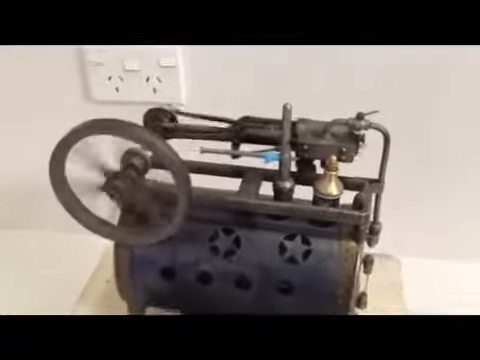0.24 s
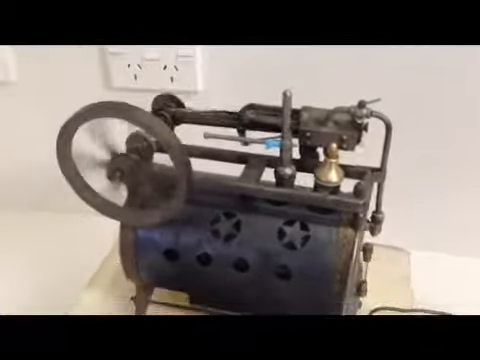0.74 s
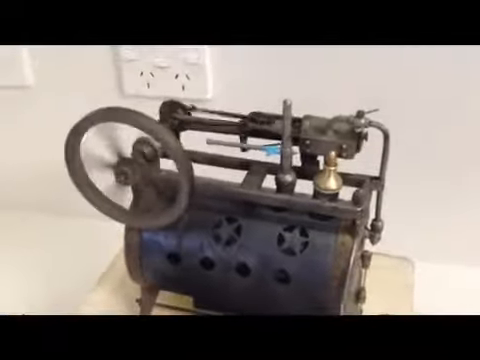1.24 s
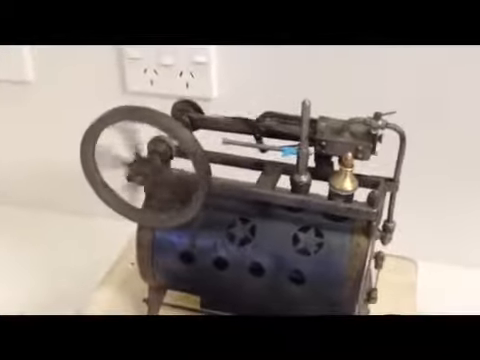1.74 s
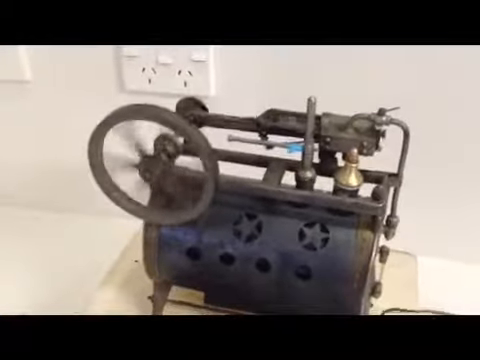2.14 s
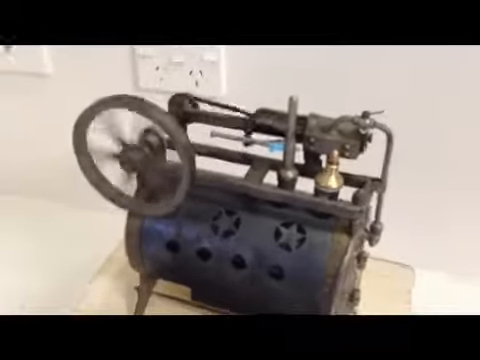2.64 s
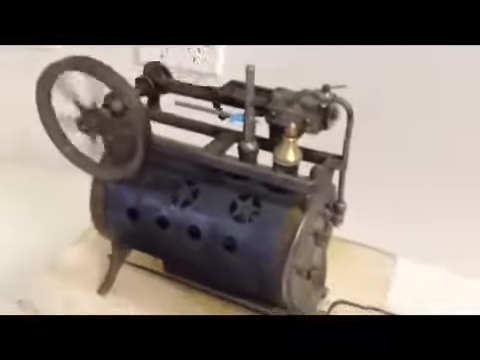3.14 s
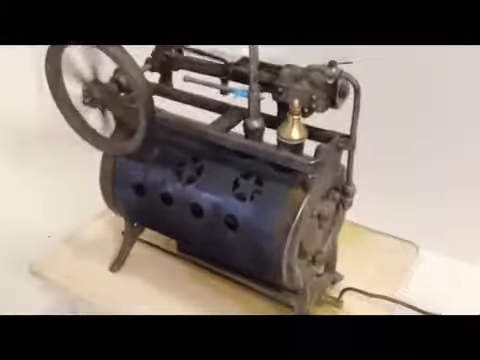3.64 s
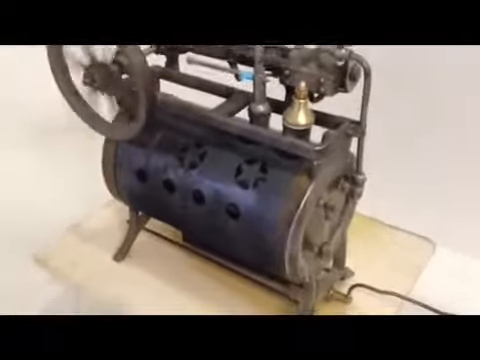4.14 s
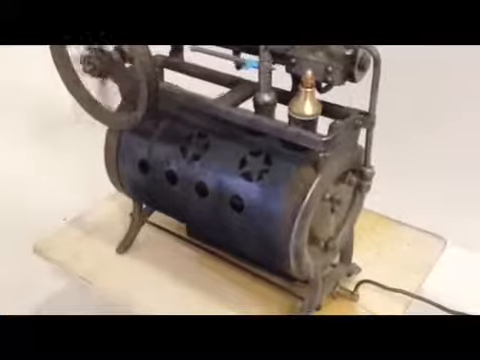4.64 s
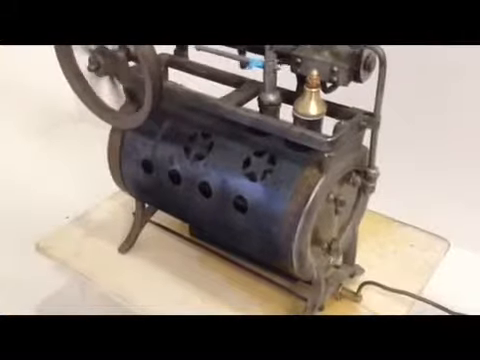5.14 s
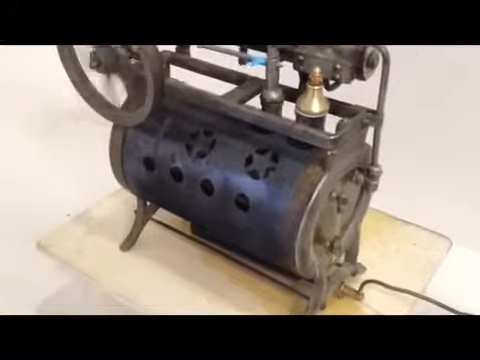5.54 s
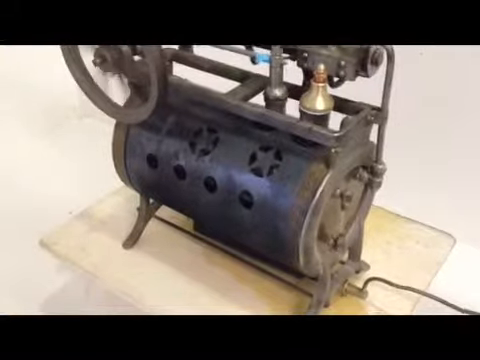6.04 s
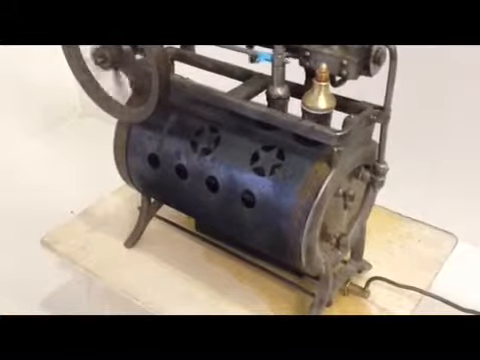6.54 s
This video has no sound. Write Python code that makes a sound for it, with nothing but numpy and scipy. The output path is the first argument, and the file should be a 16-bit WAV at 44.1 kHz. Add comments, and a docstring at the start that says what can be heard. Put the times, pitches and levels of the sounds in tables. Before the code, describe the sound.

Rapid mechanical chugging from a small metal engine, already running and never stopping. A rough low piston judder alternates with a dull bouncing rod knock, giving about six beats a second. Thin casing clatter, fine ticks and small puffs fill the gaps, bearings rumble softly and leaking steam hisses brightly throughout. Close, dry handheld pickup with a very short room reflection and little deep bass.

```python
"""A toy steam engine runs at about three turns a second on a wooden board; each turn the piston judders
through one stroke as a rough tone with jolts, and the slack rod knocks the board on the way back.
The slide valve clicks and puffs, the linkage clatters and ticks, the bearings rumble as filtered noise,
and leaking steam hisses as coloured noise; the view swings from the boiler's side to its end."""
import sys
import numpy as np
from scipy import signal
from scipy.fft import rfft, irfft, next_fast_len
from scipy.io import wavfile

SR = 44100
rng = np.random.default_rng(int(sys.argv[2]) if len(sys.argv) > 2 else 0)


def unload_audio(sound):
    """Save the sound as a 16-bit wav file, at the path given as the first command line argument."""
    columns = np.transpose(np.atleast_2d(sound))
    # keep every value between -1 and 1, then stretch to whole-number steps
    steps = np.round(np.clip(columns, -1, 1) * 32767)
    wavfile.write(sys.argv[1], SR, steps.astype(np.int16))


N = 298557

# modes of the board under the engine: f/Hz, relative level/dB, t60/s
BOARD_MODES = [(127.3, -31.0, 0.027), (230.5, -2.0, 0.066), (298.6, 8.9, 0.028), (366.7, 2.3, 0.092),
               (404.6, -11.3, 0.074), (497.5, -22.9, 0.079), (593.1, -17.6, 0.05)]
# camera swing from the boiler's side to its end: t/s, share of the way
CAMERA_SWING = [(0, 0), (2.4, 0.34), (3.3, 0.42), (4.3, 1), (6.8, 0.98)]
# piston's outward strokes, one a turn: t/s, level/dB before trims
STROKES = [(0.1313, -32.8), (0.4723, -31.7), (0.8112, -33.5), (1.1526, -31.4), (1.49, -32.0),
           (1.8227, -32.7), (2.1573, -33.0), (2.488, -34.6), (2.8179, -34.0), (3.1415, -32.6),
           (3.4659, -31.3), (3.7884, -31.8), (4.1062, -31.4), (4.4284, -31.2), (4.7462, -31.4),
           (5.0651, -31.5), (5.3808, -31.6), (5.6993, -31.6), (6.0099, -31.5), (6.3215, -31.1),
           (6.6328, -31.8)]
# rod's knocks on the return stroke: t/s, level/dB, rebound/dB and last touch/dB re first blow,
# metal crack/dB before trims
ROD_KNOCKS = [(0.293, -33.3, 0.1, -9.8, -41), (0.6336, -32.6, -0.6, -9.1, -41),
              (0.9738, -34.3, 0.1, -13.8, -47), (1.3111, -31.7, -3.6, -7.6, -41),
              (1.6474, -32.7, -2.0, -9.6, -40), (1.9819, -32.5, -4.5, -11.4, -45),
              (2.3155, -34.9, -0.1, -14.1, -45), (2.6443, -32.3, -2.9, -10.0, -41),
              (2.9725, -33.2, -2.8, -15.1, -44), (3.2978, -33.5, -2.9, -11.8, -42),
              (3.6225, -34.5, -0.4, -12.3, -42), (3.9441, -35.5, 1.7, -9.8, -46),
              (4.264, -38.5, 4.4, -4.6, -43), (4.5833, -37.8, 3.3, -9.9, -45),
              (4.902, -37.1, 3.5, -5.3, -46), (5.2242, -32.1, -1.2, -5.6, -45),
              (5.5394, -35.5, -0.8, -8.1, -49), (5.8537, -35.2, -1.3, -9.2, -41),
              (6.1637, -35.8, 1.2, -12.3, -40), (6.4781, -34.9, -2.3, -6.7, -40)]
# valve openings, two a turn: t/s, low ring/dB, high ring/dB, click/dB, all before trims
VALVE_OPENINGS = [(0.123, -53, -56.5, -55), (0.276, -48, -63, -51), (0.463, -47, -47, -48),
                  (0.617, -43.5, -56.5, -49), (0.802, -60, -45.5, -46), (0.953, -61, -56, -51),
                  (1.138, -55, -54.5, -49), (1.293, -47, -54, -40), (1.483, -62, -53, -50),
                  (1.628, -50, -50, -45), (1.819, -61, -49.5, -55), (1.963, -48, -54.5, -43),
                  (2.144, -55, -56.5, -49), (2.296, -48.5, -63, -51), (2.481, -62, -51, -53),
                  (2.627, -47, -51, -39), (2.805, -57, -49, -53), (2.952, -48.5, -63, -55),
                  (3.13, -49, -52, -41), (3.278, -48, -54, -46), (3.462, -53, -50, -54),
                  (3.607, -64, -60, -51), (3.776, -63.5, -55, -51), (3.925, -53, -53.5, -49),
                  (4.098, -53.5, -60.5, -51), (4.242, -58, -57, -48), (4.423, -58, -50, -45),
                  (4.565, -53, -58, -48), (4.739, -51, -57.5, -48), (4.882, -52, -55.5, -48),
                  (5.056, -55, -50.5, -49), (5.206, -64, -64, -53), (5.372, -49, -55, -42),
                  (5.517, -48, -52.5, -41), (5.686, -55, -46, -44), (5.83, -47.5, -61, -49),
                  (6.004, -53, -56, -47), (6.144, -55, -49, -48), (6.31, -45.5, -54, -41),
                  (6.456, -47, -55, -40), (6.624, -57, -52, -46)]
CRACK_T60_S = .02  # bare metal contact


def amp(db):
    """Decibels to gain."""
    return 10 ** (np.asarray(db) / 20)


def unit(x):
    """Scale to rms 1."""
    return x / np.sqrt(np.mean(x ** 2) + 1e-20)


def clock(count=N):
    """Time of each sample, s."""
    return np.arange(count) / SR


def curve(rows, s):
    """Each column after the first, interpolated at time s."""
    knots, *cols = np.transpose(rows)
    return [np.interp(s, knots, c) for c in cols]


def filtered(x, response):
    """x times a response of frequency, with zero padding."""
    m = next_fast_len(len(x) + SR // 4)
    spectrum = rfft(x, m) * response(np.fft.rfftfreq(m, 1 / SR))
    return irfft(spectrum, m)[:len(x)]


def coloured(x, spectrum):
    """x through a (f/Hz, level/dB) response, at rms 1."""
    f, db = np.transpose(spectrum)
    return unit(filtered(x, lambda hz: amp(np.interp(np.log(hz + 1), np.log(f), db))))


def noise(count=N):
    """Fresh white noise."""
    return rng.standard_normal(count)


def wobble(falloff_hz, count=N):
    """Smooth random curve of rms 1; its spectrum falls by 1/e every falloff_hz."""
    return unit(filtered(noise(count), lambda hz: np.exp(-hz / falloff_hz)))


def swell(t, rise_s, t60_s):
    """Envelope that rises to 1, then dies away exponentially."""
    rise = np.sin(np.pi / 2 * np.clip(t / rise_s, 0, 1)) ** 2
    return rise * amp(-60 * np.maximum(t - rise_s, 0) / t60_s)


def add(track, s, x):
    """Mix x into the track at time s."""
    part = track[max(round(s * SR), 0):][:len(x)]
    part += x[:len(part)]


def ring(modes, t):
    """Decaying sines of a struck body from t = 0; neighbouring modes swing opposite ways."""
    t = np.maximum(t, 0)
    out = 0
    for k, (hz, db, t60_s) in enumerate(modes):
        out = out + (-1) ** k * amp(db - 60 * t / t60_s) * np.sin(2 * np.pi * hz * t)
    return out


def shaken(x, modes):
    """Modes driven by force x, through a unit-energy impulse response."""
    answer = ring(modes, clock(SR // 4))
    return signal.fftconvolve(x, answer / np.linalg.norm(answer))[:len(x)]


def view():
    """Share of the camera's swing at each sample, 0 to 1."""
    return np.clip(curve(CAMERA_SWING, clock())[0], 0, 1)


def turns(events):
    """Running cycle count at each sample, a whole number at every event of a table."""
    s = np.pad(np.transpose(events)[0], 1, mode="reflect", reflect_type="odd")
    return np.interp(clock(), s, np.arange(len(s)))


def casing(force):
    """Sheet-metal boiler casing: its modes weigh differently towards the side and the end."""
    # f/Hz, relative level from the side/dB, relative level from the end/dB, t60/s
    casing_modes = [(585, 6, 0, 0.061), (703, 8.5, 1, 0.075), (780, 3, -1, 0.06), (900, -3, -5, 0.08),
                    (1080, -2, -4, 0.08), (1186, -8, -6, 0.06), (1290, 0, -3, 0.05), (1402, -7, -4.5, 0.09),
                    (1457, -2, -9, 0.045), (1660, 5, 1, 0.055), (1777, 10.5, 3, 0.03), (1845, 11, 2, 0.033),
                    (2090, -7, 0, 0.035), (2265, -12, -2, 0.04), (2500, -12, -4, 0.025)]
    side = shaken(force, [(hz, db, t60) for hz, db, _, t60 in casing_modes])
    end = shaken(force, [(hz, db, t60) for hz, _, db, t60 in casing_modes])
    return side + view() * (end - side)


def blow(t):
    """The board's answer to one padded contact at t = 0: modes under a soft onset and an added decay."""
    return ring(BOARD_MODES, t) * swell(t, .003, 0.33)


def crack(db, t60_s):
    """Envelope of one hard metal contact."""
    return amp(db) * swell(clock(SR // 8), 0.00088, t60_s)


def bump(db, contact_s=.0009):
    """Force of one oiled, softer contact: a half sine of fixed area."""
    push = np.sin(np.pi * np.minimum(clock(SR // 100) / contact_s, 1))
    return amp(db) * push / push.sum()


def steam(hiss_db=1, fizz_db=1.0, firebox_db=-5, gland_db=-13, spits_per_s=300, spit_db=-14,
          flutter_db=0.59, surge_db=0.47, surge_peak_cycle=0.29):
    """Wet steam leaks past the glands: a hiss that rings in the firebox, a fine fizz, tiny spits of water."""
    # leak: t/s, hiss level/dB, fizz level/dB, both before trims
    leak = [(0.0, -52, -52), (1.11, -51.5, -51.5), (2.32, -52, -53), (3.18, -51.5, -50), (4.86, -52, -48.5),
            (6.77, -51.5, -49.5)]
    # noise colours: f/Hz, relative level/dB
    hiss_spectrum = [(100, -3), (600, -3.5), (1000, -1), (1550, -2.5), (1950, 2), (2750, 1), (3450, 1.5),
                     (3750, 1.5), (4400, 2.5), (4620, 7), (4780, 4.5), (4930, 1.5), (5150, 0), (5800, 0.5),
                     (7200, 3.5), (10000, -10.5)]
    fizz_spectrum = [(3000, -11.5), (5600, -24), (6700, -7.5), (7600, -2), (8600, -0.5), (9900, -4),
                     (11000, -3), (12400, 1.5), (13500, -2), (14300, -1.5), (15300, -4.5)]
    # hollow resonances of the firebox, heard from its end: f/Hz, relative level/dB, t60/s
    firebox_modes = [(3115, -3.5, 0.041), (3414, -0.5, 0.065), (4844, -1, 0.053), (5660, 8, 0.012),
                     (7410, 10, 0.0074), (8900, -20, 0.01), (12600, -7, 0.0065)]
    # faint singing of the leaking gland: f/Hz, relative level/dB, t60/s
    gland_modes = [(4800, 0, .025)]
    hiss, fizz = curve(leak, clock())
    # the leak surges with each valve opening and sinks before the next
    surge = surge_db * np.cos(2 * np.pi * (turns(VALVE_OPENINGS) - surge_peak_cycle))
    flutter = amp(flutter_db * wobble(29))
    spits = (rng.random(N) < spits_per_s / SR) * noise()

    def jet():
        return noise() + amp(spit_db) * unit(spits)

    body = amp(hiss_db) * coloured(jet(), hiss_spectrum)
    body = body + amp(firebox_db) * view() * unit(shaken(jet(), firebox_modes))
    body = body + amp(gland_db) * unit(shaken(noise(), gland_modes))
    fine = amp(fizz + fizz_db) * coloured(jet(), fizz_spectrum)
    return flutter * (amp(hiss + surge) * body + fine)


def bearings(board_db=-53, table_db=-60, casing_db=-68.0, fresh=0.43, lumpy_db=3.5, swing_db=3.5,
             heaviest_turn=0.45, kick_db=4, kick_fade_turns=.07):
    """Worn bearings rumble through the board; the same rough spots come round on every turn."""
    # rumble colour: f/Hz, relative level/dB
    rumble_spectrum = [(20, -19), (45, -8), (70, -15), (110, -15.5), (160, -4), (195, -1.5), (236, -0.5),
                       (285, -8.5), (360, -8.5), (460, 2), (600, -11), (1500, -33.5)]
    angle = turns(STROKES) % 1
    size = round(np.diff(np.transpose(STROKES)[0]).mean() * SR)
    rough_spots = noise(size)[(angle * size).astype(int)]
    force = unit(rough_spots + fresh * noise())
    # heaviest round the return stroke, with a kick as the outward stroke starts
    load_db = swing_db * np.cos(2 * np.pi * (angle - heaviest_turn))
    load_db = load_db + kick_db * np.exp(-angle / kick_fade_turns)
    wood = amp(board_db) * unit(shaken(coloured(force, rumble_spectrum), BOARD_MODES))
    wood = wood + amp(table_db) * coloured(noise(), rumble_spectrum)
    return amp(load_db + lumpy_db * wobble(66)) * wood + amp(casing_db) * unit(casing(force))


def table(board, hum_db=-55):
    """The board's shaking sets the table top humming in a few narrow tones."""
    # f/Hz, relative level/dB, t60/s
    table_modes = [(239, -3, .2), (302, -1, .22), (346, -1, .25), (371, -1, .25), (409, 6, .2),
                   (576, 9, .18)]
    return board + amp(hum_db) * unit(shaken(board, table_modes))


def valve(puff_db=-52.5, end_db=2, puff_rise_s=0.013, puff_t60_s=0.22, burst_db=-3, burst_t60_s=0.072,
          again_s=0.015, again_db=-7, gear_rise_s=.002, click_db=-2, chink_db=9.5):
    """Slide valve: a sharp puff that tails off; its gear clicks and chinks on opening and at end of travel."""
    # rings of the valve gear, low and high: f/Hz before scatter, t60/s
    gear_rings = [(6640, 0.019), (7560, 0.0093)]
    # puff colour, then bare metal click colour: f/Hz, relative level/dB
    puff_spectrum = [(100, -50), (400, 16), (1500, 6), (4000, 6.5), (8000, 6), (15000, 2)]
    click_spectrum = [(1000, -25), (3000, -8), (6000, -13), (8500, 6), (10300, 6), (12300, 12), (15000, -9)]
    puffs, chinks, clicks = np.zeros((3, N))
    t = clock(SR // 3)
    rub = swell(t, gear_rise_s, 0.019) + amp(again_db) * swell(t - again_s, gear_rise_s, 0.018)
    puff = swell(t, puff_rise_s, puff_t60_s) + amp(burst_db) * swell(t, 0.0055, burst_t60_s)
    for s, *levels_db, hit_db in VALVE_OPENINGS:
        add(clicks, s, crack(hit_db + click_db, CRACK_T60_S))
        add(clicks, s + again_s, crack(hit_db + click_db + again_db, CRACK_T60_S))
        add(puffs, s - .002, puff)
        for (hz, t60_s), db in zip(gear_rings, levels_db):
            mode = (hz * (1 + 0.0046 * rng.standard_normal()), 0, t60_s)
            chink = shaken(rub * noise(len(t)), [mode])
            add(chinks, s, amp(db + chink_db) * chink / np.abs(chink).max())
    puffing = amp(puff_db + end_db * view()) * puffs * coloured(noise(), puff_spectrum)
    return chinks + clicks * coloured(noise(), click_spectrum) + puffing


def contacts(touch_lead_s=.009, crack_lead_s=0.002497, end_lead_s=0.00292, touch_db=20, crack_db=-3.0,
             tap_bump_db=17, tap_crack_db=-3, play_early_turns=0.01706, play_end_db=-7.5, board_db=-27,
             scatter_db=1.2):
    """Linkage blows: the rod touches and cracks home, the crank ticks over, bearings shift in their slack."""
    # joint ticks as the crank passes over, a quarter turn before the knock: t/s, level/dB before trims
    crank_taps = [(0.2105, -41.5), (0.551, -46.5), (0.8931, -55), (1.23, -43), (1.5651, -43), (1.9026, -47),
                  (2.235, -51.2), (2.5667, -55), (2.8946, -51), (3.2183, -48), (3.5421, -50), (3.8621, -48),
                  (4.1906, -51.4), (4.503, -53.7), (4.8197, -41), (5.1383, -43), (5.4547, -42),
                  (5.7704, -43), (6.0833, -46), (6.3947, -46)]
    # bearing slack taken up: angle after the knock/turn, soft bump/dB, hard tick/dB, before view and scatter
    bearing_play = [(.055, -22, -67), (.1, -23.5, -80), (0.182, -41, -43), (.265, -27, -44),
                    (0.307, -26, -64)]
    # bare metal contact colour: f/Hz, relative level/dB
    crack_spectrum = [(300, -18), (700, 6), (1200, -5), (1550, -6), (1830, 3), (2300, -7), (4500, -5),
                      (7000, -14), (15000, -15)]
    soft, hard, wood = np.zeros((3, N))
    turn_s = np.diff(np.transpose(ROD_KNOCKS)[0]).mean()
    for s, *_, db in ROD_KNOCKS:
        swing, = curve(CAMERA_SWING, s)
        add(soft, s - touch_lead_s - end_lead_s * swing, bump(db + touch_db))
        add(hard, s - crack_lead_s - end_lead_s * swing, crack(db + crack_db, CRACK_T60_S))
        scatter = rng.standard_normal((len(bearing_play), 2))
        for (angle, bump_db, tick_db), (when, size) in zip(bearing_play, scatter):
            at = s + turn_s * (angle - play_early_turns * swing + 0.00374 * when)
            trim_db = play_end_db * swing + scatter_db * size
            add(soft, at, bump(bump_db + trim_db))
            add(hard, at, crack(tick_db + trim_db, CRACK_T60_S))
            add(wood, at, amp(bump_db + trim_db + board_db) * blow(clock(SR // 4)))
    for s, db in crank_taps:
        add(soft, s, bump(db + tap_bump_db))
        add(hard, s, crack(db + tap_crack_db, CRACK_T60_S))
    return casing(soft) + hard * coloured(noise(), crack_spectrum) + wood


def clatter(lead_s=0.0093, end_lead_s=0.0049, rise_s=0.0067, t60_s=0.14, casing_db=-2, dry_db=-5.0,
            end_db=1.5, outward_db=-13, outward_end_db=5, grain_db=3.5):
    """The loose joint scrapes and rattles the casing as the rod changes sides."""
    # how hard the joint rattles: t/s, level/dB before trims
    rattle = [(0, -42.5), (1.5, -46), (2.6, -44), (3.7, -46.5), (4.9, -47.5), (5.22, -46), (5.54, -47.5),
              (6.77, -43)]
    # bare scrape colour: f/Hz, relative level/dB
    scrape_spectrum = [(60, -45), (250, -35), (550, 19), (800, 6.5), (1300, 10.5), (1900, 11.5), (2800, 5),
                       (8000, -37), (15000, -29)]
    force, t = np.zeros(N), clock(SR // 4)
    for s, *_ in ROD_KNOCKS:
        db, = curve(rattle, s)
        swing, = curve(CAMERA_SWING, s)
        add(force, s - lead_s - end_lead_s * swing, amp(db) * swell(t, rise_s, t60_s))
    for s, _ in STROKES:
        db, = curve(rattle, s)
        swing, = curve(CAMERA_SWING, s)
        add(force, s, amp(db + outward_db + outward_end_db * swing) * swell(t, 0.0073, 0.05))
    # the scraping comes in small catches
    force = force * unit(amp(grain_db * wobble(800)))
    # the bare scrape carries better towards the boiler's end
    scrape = amp(dry_db + end_db * view()) * force * coloured(noise(), scrape_spectrum)
    return amp(casing_db) * casing(force * noise()) + scrape


def room(x, wet_db=-10, t60_s=0.085):
    """The nearby wall and table answer briefly: a decaying noise tail of unit energy."""
    t = clock(SR // 3)
    tail = noise(len(t)) * swell(t, 0.0006, t60_s)
    return x + amp(wet_db) * signal.fftconvolve(x, tail / np.linalg.norm(tail))[:N]


def knock(gain_db=0, settle_gaps=2.099, tap_db=-18, tap_lead_s=0.067, tap_scatter_s=0.0012):
    """The rod takes up slack: light tap, then blow, rebound and last touch, all rung out by the board."""
    # rebound quickens as the engine speeds up: t/s, gap/s
    bounce = [(2.7, .00926), (3.9, .00886)]
    out, t = np.zeros(N), clock(SR // 4)
    for s, db, rebound_db, settle_db, _ in ROD_KNOCKS:
        gap_s, = curve(bounce, s)
        strikes = blow(t) + amp(rebound_db) * blow(t - gap_s)
        strikes = strikes + amp(settle_db) * blow(t - settle_gaps * gap_s)
        add(out, s, amp(db + gain_db) * strikes)
        tap_s = s - tap_lead_s + tap_scatter_s * rng.standard_normal()
        add(out, tap_s, amp(db + tap_db) * blow(t))
    return out


def judder(pitch_hz=356.3, rise_s=0.013, sag_t60_s=0.35, gain_db=0, hold_s=.032, hold_scatter_s=0.00021,
           release_t60_s=.0187, rough_db=.5, rough_phase_rad=.05):
    """The piston sticks and slips near a board resonance, a roughened sine, and jolts the board."""
    # jolts as it starts, grips and lets go: t after the stroke's start/s, level re stroke/dB
    jolts = [(-.0005, -14.8), (.00874, -11.9), (.0235, -10.3)]
    out, t = np.zeros(N), clock(SR // 4)
    for (s, db), length in zip(STROKES, rng.standard_normal(len(STROKES))):
        released_s = np.maximum(t - hold_s - hold_scatter_s * length, 0)
        grip = swell(t, rise_s, sag_t60_s) * amp(-60 * released_s / release_t60_s)
        phase = 2 * np.pi * pitch_hz * t + rough_phase_rad * wobble(160, len(t))
        tone = grip * amp(rough_db * wobble(210, len(t))) * np.sin(phase)
        add(out, s, amp(db + gain_db) * tone)
        for delay_s, jolt_db in jolts:
            add(out, s + delay_s, amp(db + gain_db + jolt_db) * blow(t))
    return out


def scene():
    """Engine and steam, the same on both channels."""
    metal_and_steam = room(clatter() + contacts() + valve() + steam())
    sound = judder() + table(knock() + bearings()) + metal_and_steam
    return np.array([sound, sound])


def record(dry, low_cut_hz=135, top_hz=15350):
    """The camera cuts the deep bass (third order) and keeps nothing above its band limit."""
    def response(hz):
        return hz ** 3 / np.sqrt(hz ** 6 + low_cut_hz ** 6) * (hz < top_hz)

    return np.array([filtered(channel, response) for channel in dry])


dry = scene()
out = record(dry)
unload_audio(out)
```